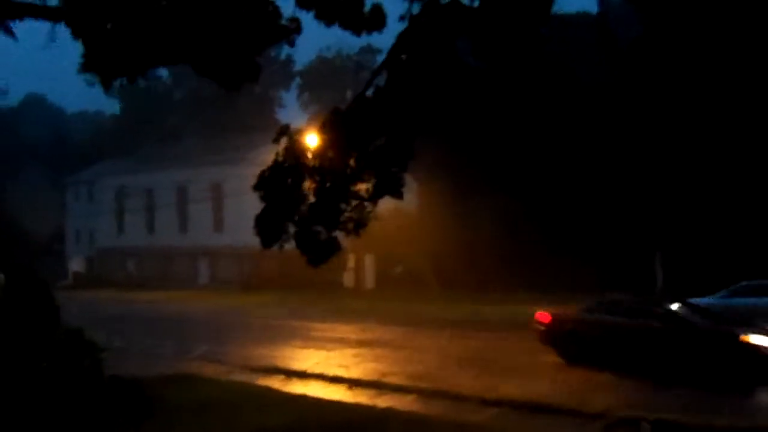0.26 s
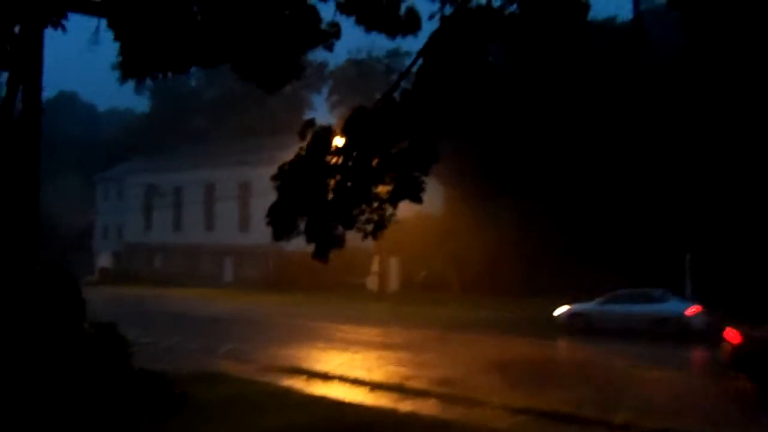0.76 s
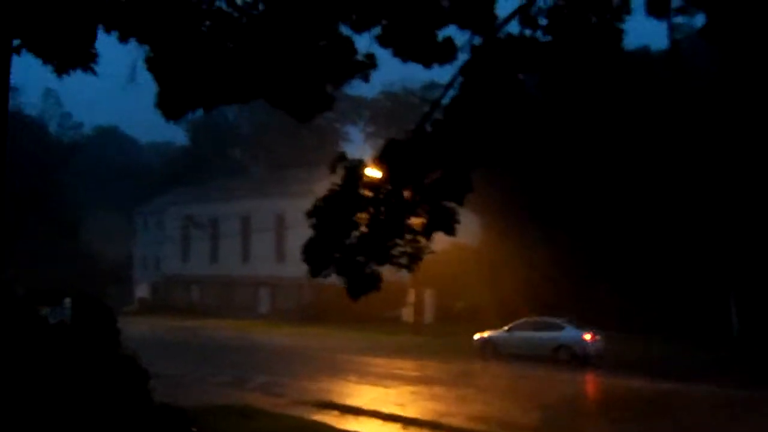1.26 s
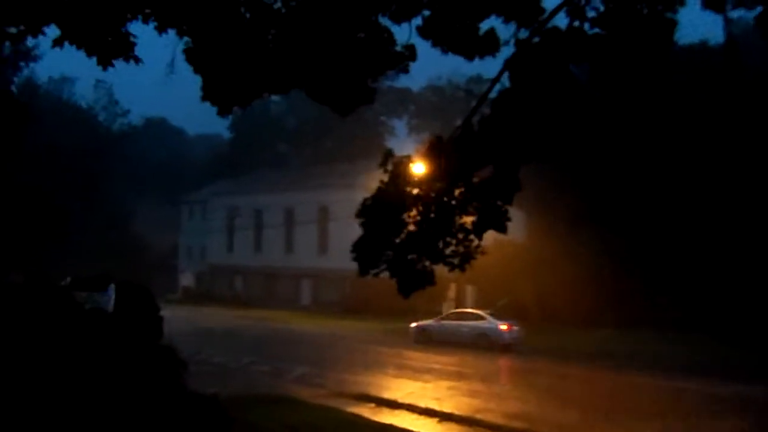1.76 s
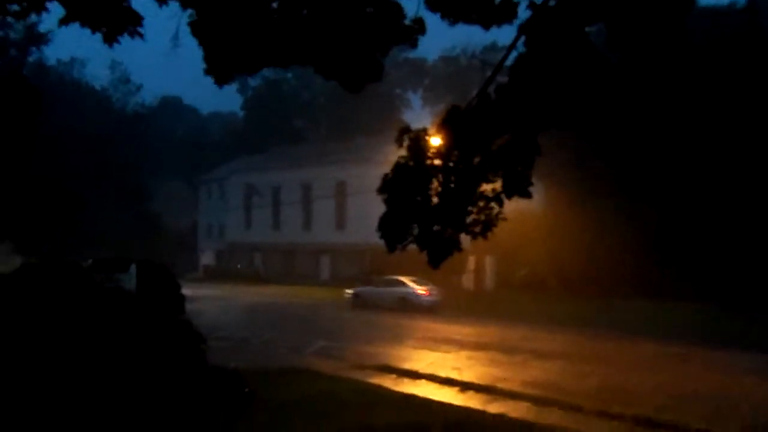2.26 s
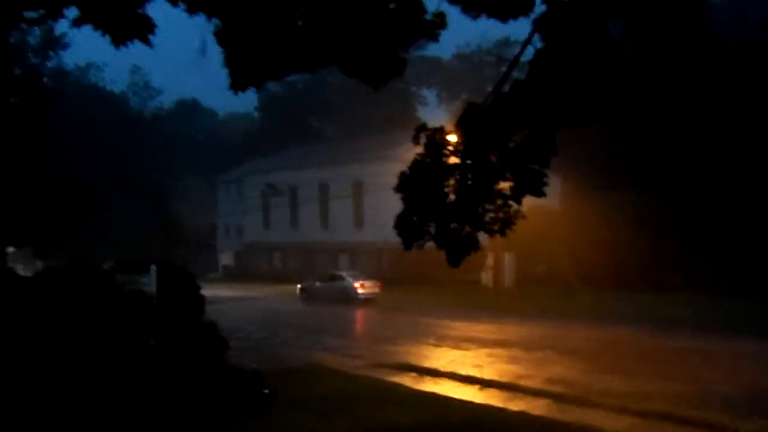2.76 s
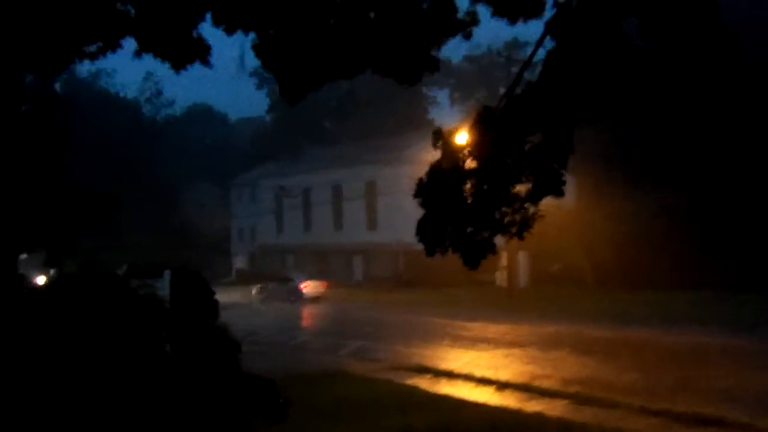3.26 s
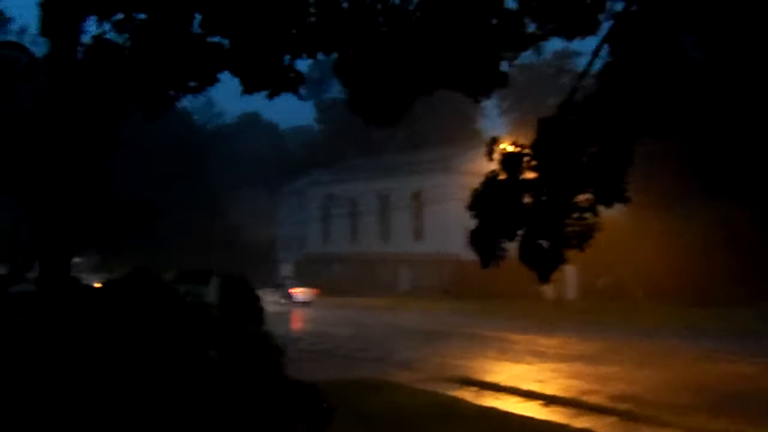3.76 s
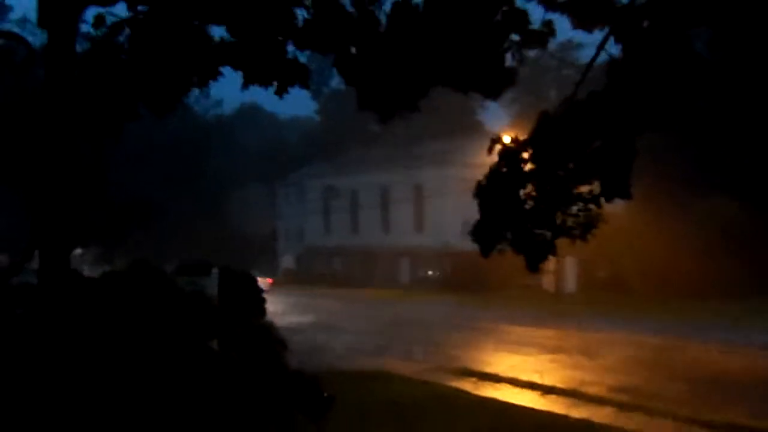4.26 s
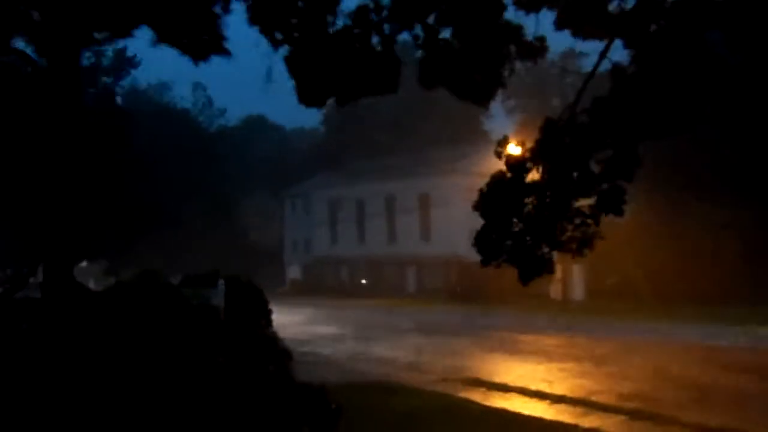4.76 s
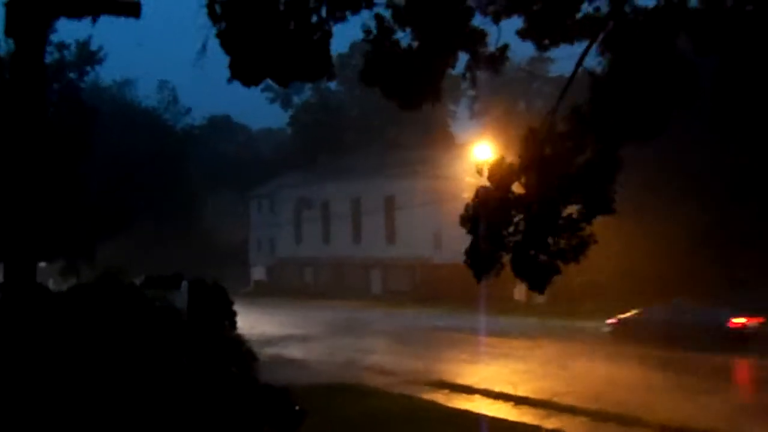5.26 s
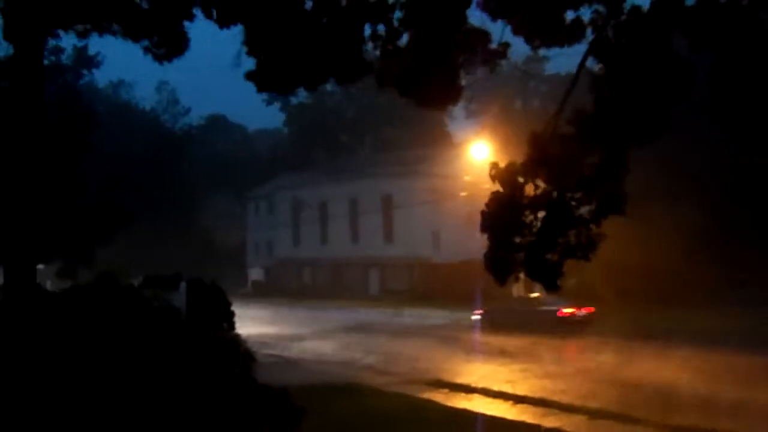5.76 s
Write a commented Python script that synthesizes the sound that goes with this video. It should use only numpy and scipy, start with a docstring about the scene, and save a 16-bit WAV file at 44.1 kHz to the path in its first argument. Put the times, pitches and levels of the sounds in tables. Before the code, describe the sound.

Outdoors on a wet street at dusk, dense rain hisses continuously on asphalt and leaves, blended with the broad wash of car tyres. Low thunder starts within the first second, thumps and rumbles, ebbs around three seconds, then builds into a much louder near peal just before five seconds, rolling on to the end. One small microphone, mono; the loud thunder flattens and pushes the rain down.

```python
"""Street at dusk in heavy rain, heard by one small microphone; tyres hiss past on the wet road.
Rain and tyres: patchy filtered noise plus grains. Far traffic: a low filtered-noise drone.
Thunder: filtered impulses under overlapping peals, with single claps of a few low cycles.
The last peal is near enough to pull the gain control down and to clip."""
import sys
import numpy as np
from scipy import signal
from scipy.fft import rfft, irfft, next_fast_len
from scipy.io import wavfile
from scipy.ndimage import uniform_filter1d, minimum_filter1d, map_coordinates

SR = 44100
rng = np.random.default_rng(int(sys.argv[2]) if len(sys.argv) > 2 else 0)


def materialize(psi):
    """Save the field psi as 16-bit PCM at rate SR to the path in sys.argv[1].

    A 1-D psi becomes a single channel; in a 2-D psi each row is a channel.
    """
    bounded = np.clip(np.atleast_2d(psi).T, -1, 1)
    quanta = np.round(bounded * 32767).astype(np.int16)
    wavfile.write(sys.argv[1], SR, quanta)


def invert_db(level):
    """Linear amplitude ratio for a level in decibels (20 dB per decade), elementwise."""
    return 10 ** (np.asarray(level, dtype=float) / 20)


N = 265041  # samples

# Wet street, ahead of gain control: [t/s, road rain level/dB, tyre roar re road/dB, leaf patter re road/dB]
STREET_LEVELS = [(0.0, -30.5, -4.5, -2), (0.4, -32.5, -2.5, -2), (0.9, -34, -1.5, -2.1),
                 (1.4, -33.5, -1.5, -1.5), (2.1, -33, -2, -1), (2.7, -32, -2, -.3), (3.3, -31, -2.5, -0.6),
                 (3.6, -29.5, -2.5, 0), (3.85, -28.5, -4, -4.5), (4.3, -29, -3.5, -3.8), (4.9, -29, -5, -3),
                 (5.3, -27.5, -3, -3), (6.0, -28, -4, -3)]
# Thunder peals, ahead of gain control:
# [arrival t/s, strength/dB, fade/(dB/s) with sign ignored, boom re strength/dB, crackle re strength/dB]
THUNDER_PEALS = [(0.55, -32.5, 16, 1, -11), (0.63, -33.5, 14, 0, -21), (0.87, -38, 10.5, 6, -17),
                 (1.23, -28, 60, 2, -9), (1.35, -28, 40, -15, -15), (1.6, -39.5, 4, 4, -14),
                 (2.06, -27, 33, -6, -7.5), (2.11, -27.5, 33, -1.5, -10), (2.4, -34.5, 8.5, -4, -10.5),
                 (2.93, -41, 20, -4, -13), (3.36, -31, 18, -8, -10), (3.62, -37, 12, -6, -5),
                 (4.06, -36, 10, -6, -11), (4.27, -26, 25, 0, -5), (4.31, -21, 16, -6, -5.5),
                 (4.43, -21, 23, -14, -9), (4.561, -25.5, 14, 3.5, -17), (4.69, -16.5, 15, -8, -8.5),
                 (4.86, -11.5, 36, -3.5, -6.5), (4.94, -14, 58, 2.5, -29), (5.12, -17.5, 15, -3, -9),
                 (5.33, -16.5, 52, -3, -15), (5.5, -21.5, -0.5, -2, -14.5), (5.93, -15.5, 10, -5, -17)]
# Claps that stand out of the roll, ahead of gain control: [centre t/s, peak level/dB, f/Hz]
THUNDER_CLAPS = [(0.685, -20, 180), (0.692, -27, 67.5), (0.931, -25, 89), (1.03, -21, 68), (1.13, -23, 72),
                 (1.29, -18.5, 68.4), (1.335, -16.5, 67.4), (1.391, -22.5, 157), (2.148, -21, 60),
                 (2.153, -19, 158), (2.196, -20, 182), (2.221, -20, 79), (2.249, -27, 183),
                 (2.842, -25, 209), (3.65, -26, 65), (4.15, -23, 156), (4.338, -20, 90), (4.349, -13, 213),
                 (4.385, -14, 240), (4.392, -14, 79.6), (4.448, -21, 78), (4.474, -14, 245),
                 (4.518, -18, 278), (4.55, -9, 214), (4.585, -15.5, 55), (4.717, -7, 209), (4.771, -6, 209),
                 (4.844, -2, 267), (4.896, -0.5, 240), (4.91, -8, 42), (4.919, -5, 104), (4.965, -3, 243),
                 (4.975, -8, 89), (5.005, -11.5, 36), (5.183, -9, 158), (5.205, -10, 183), (5.23, -8, 182),
                 (5.373, -9, 182), (5.416, -11.3, 209), (5.637, -10.5, 118), (5.677, -14, 120),
                 (5.986, -14, 102)]
# Rain on the road, spectrum: [f/Hz, relative level/dB per Hz]
ROAD_SPECTRUM = [(1240, -12.5), (2100, -3.5), (2530, 0), (3490, 1.5), (4700, -5.5), (6110, -13),
                 (10300, -120)]
# Bright spatter of drops, spectrum: [f/Hz, relative level/dB per Hz]
SPATTER_SPECTRUM = [(4300, -15.5), (7300, -3.5), (9500, -2.5), (12300, -3.5), (14200, -7.5)]
# Rain on leaves, spectrum: [f/Hz, relative level/dB per Hz]
LEAF_SPECTRUM = [(2590, -22), (4400, -0.5), (6300, -1), (7800, -6), (10100, -14.5), (17200, -120)]
# Tyres on the wet road, spectrum: [f/Hz, relative level/dB per Hz]
TYRE_SPECTRUM = [(240, -28), (400, -6.5), (477, -8.5), (509, -5.5), (921, -2), (1570, -1), (2300, -2),
                 (2990, -44), (5060, -120)]
# Thunder, lowest range, spectrum: [f/Hz, relative level/dB per Hz]
BOOM_SPECTRUM = [(12, -34), (20, -10), (45, -1.5), (60, 1), (72, 5), (86, -5), (110, -11.5), (140, -11),
                 (240, -120)]
# Thunder, middle range, spectrum: [f/Hz, relative level/dB per Hz]
BODY_SPECTRUM = [(56, -50), (95, -5), (145, 0.5), (209, 1.5), (351, -9), (420, -18), (550, -36),
                 (920, -120)]
# Thunder, upper range, spectrum: [f/Hz, relative level/dB per Hz]
CRACKLE_SPECTRUM = [(220, -28), (380, -2.5), (470, -3), (570, -1), (680, -6.5), (900, -9.5), (1300, -19),
                    (1700, -40), (2860, -120)]
# Engines and far traffic, spectrum: [f/Hz, relative level/dB per Hz]
TOWN_SPECTRUM = [(13, -33), (22, 0), (54, -0.5), (136, -1), (233, 0), (272, -2.5), (450, -19), (580, -34),
                 (990, -120)]

# Spatter re road: start, growth, ceiling
SPATTER_START_DB, SPATTER_GROWTH_DB_PER_S, SPATTER_CEILING_DB = -4.2, 0.6, -2
PEAL_RISE_S, CRACKLE_FADE_RATIO = 0.025, 1.77
CLAP_CYCLES_AT_200_HZ, CLAP_CYCLES_POWER = 4.13, 0.26  # deeper claps have fewer cycles


def rain():
    """Drops and tyres merge into a patchy hiss; gusts sway the finer layers."""
    road_db, tyre_db, leaf_db = curves(STREET_LEVELS)
    growing_db = SPATTER_START_DB + SPATTER_GROWTH_DB_PER_S * np.arange(N) / SR
    spatter_db = np.minimum(growing_db, SPATTER_CEILING_DB)
    gust = wobble(11) + 0.98 * wobble(22)
    tyres = invert_db(tyre_db) * coloured(patchy_noise(patchy_db=0.5), TYRE_SPECTRUM)
    road = invert_db(0.17 * gust) * coloured(drops(), ROAD_SPECTRUM)
    leaves = invert_db(leaf_db + 0.34 * gust) * coloured(drops(), LEAF_SPECTRUM)
    spatter = invert_db(spatter_db + 0.22 * gust) * coloured(drops(), SPATTER_SPECTRUM)
    return invert_db(road_db) * (tyres + road + leaves + spatter)


def drops():
    """Far drops merge into patchy noise; nearer drops add a faint grain of impulses."""
    far = patchy_noise(patchy_db=0.76)
    near = impacts(count=30000, spread_db=2.5)
    return far + invert_db(-8.5) * near


def roll():
    """Shocks from every bend of the lightning channel overlap; ground and walls colour three ranges."""
    shocks = impacts(count=20000, spread_db=1.23)
    # the low and middle ranges roll on more evenly between the shocks
    boom = evened(coloured(shocks, BOOM_SPECTRUM), share=0.3)
    body = evened(coloured(shocks, BODY_SPECTRUM), share=0.53)
    crackle = coloured(shocks, CRACKLE_SPECTRUM)
    return np.sum(peals() * [boom, body, crackle], axis=0)


def peals():
    """Gains of boom, body, crackle: each peal rises fast and fades; overlapping peals add in power."""
    arrival_s, strength_db, fade, boom_db, crackle_db = np.transpose(THUNDER_PEALS)[..., None]
    grid_s = np.arange(0, N / SR + .002, .002)
    since_s = np.maximum(grid_s - arrival_s, 0)
    fallen_db = abs(fade) * since_s
    level_db = [strength_db + boom_db - fallen_db,
                strength_db - fallen_db,
                strength_db + crackle_db - CRACKLE_FADE_RATIO * fallen_db]
    rise = 1 - np.exp(-since_s / PEAL_RISE_S)
    gains = np.linalg.norm(invert_db(level_db) * rise, axis=1)
    return np.array([np.interp(np.arange(N) / SR, grid_s, gain) for gain in gains])


def claps():
    """Each clap is a short swell of a few low cycles, with a burst of crackle riding on it."""
    out = np.zeros(N + SR)
    crackle = coloured(impacts(count=12000, spread_db=2.0), CRACKLE_SPECTRUM)
    crackle = np.pad(crackle, (0, SR))
    phases = rng.random(len(THUNDER_CLAPS))  # in cycles
    for (centre_s, peak_db, hz), phase in zip(THUNDER_CLAPS, phases):
        cycles = CLAP_CYCLES_AT_200_HZ * (hz / 200) ** CLAP_CYCLES_POWER
        t = np.arange(int(cycles * SR / hz)) / SR
        swell = np.sin(np.pi * t * hz / cycles) ** 2
        start = round(centre_s * SR) - len(t) // 2
        span = slice(start, start + len(t))
        tone = np.sin(2 * np.pi * (hz * t + phase))
        out[span] += invert_db(peak_db) * swell * (tone + invert_db(-20.5) * crackle[span])
    return out[:N]


def town():
    """The low drone of engines and far traffic, as filtered noise."""
    return invert_db(-41) * coloured(rng.standard_normal(N), TOWN_SPECTRUM)


def unit(x):
    """Scaled to rms 1."""
    return x / np.sqrt(np.mean(x ** 2) + 1e-20)


def curves(rows):
    """One value per sample for each column after the time."""
    t_s, *columns = np.transpose(rows)
    return [np.interp(np.arange(N) / SR, t_s, column) for column in columns]


def wobble(knots_per_s):
    """A smooth random curve through normally distributed knots."""
    knots = rng.standard_normal(int(N * knots_per_s / SR) + 4)
    return map_coordinates(knots, [np.arange(N) * knots_per_s / SR])


def coloured(x, spectrum):
    """x filtered through spectrum points joined on a log frequency axis, at rms 1."""
    size = next_fast_len(N + 8192)
    hz, db = np.transpose(spectrum)
    bins_hz = np.fft.rfftfreq(size, 1 / SR)
    gain = invert_db(np.interp(np.log(bins_hz + 1), np.log(hz + 1), db))
    return unit(irfft(rfft(x, size) * gain, size)[:N])


def impacts(count, spread_db):
    """A white stream of impulses at random moments, a few much stronger than the rest."""
    when, sign, size = rng.random((count, 3)).T
    strength = np.sign(sign - .5) * invert_db(-spread_db * np.log(1 - size))
    return unit(np.bincount((when * N).astype(int), strength, N))


def patchy_noise(patchy_db):
    """White noise whose gain drifts in patches of pitch and time."""
    z = signal.stft(rng.standard_normal(N), nperseg=512)[2]
    field = uniform_filter1d(rng.standard_normal(z.shape), size=8, axis=0)
    field = uniform_filter1d(field, size=10, axis=1)
    return signal.istft(z * invert_db(patchy_db * unit(field)), nperseg=512)[1][:N]


def evened(x, share):
    """x with a share of its chance swells levelled out, at rms 1."""
    envelope = np.abs(signal.hilbert(x, next_fast_len(N))[:N])
    swell = uniform_filter1d(envelope, 900)
    return unit(x / swell ** np.clip(share, 0, 1))


def scene():
    """One microphone feeds both channels."""
    return np.tile(rain() + roll() + claps() + town(), (2, 1))


def recent_mean(x, window_s):
    """Mean over the window just past."""
    size = int(window_s * SR)
    return signal.fftconvolve(x, np.ones(size) / size)[:N]


def gain_control(x, listen_s, hold_s, threshold_db, slope):
    """Gain falls as the recent mean level passes the threshold, and stays down for the hold time."""
    power = np.abs(recent_mean(x[0] ** 2, listen_s))
    level_db = 10 * np.log10(power + 1e-9)
    wanted_db = -slope * np.maximum(level_db - threshold_db, 0)
    span = int(hold_s * SR) // 2 * 2 + 1
    # origin turns the minimum towards the past
    held_db = minimum_filter1d(wanted_db, span, origin=span // 2, mode="nearest")
    return x * invert_db(recent_mean(held_db, 0.082))


def low_pass(x):
    """Removes everything above the highest recorded frequency."""
    return signal.sosfilt(signal.butter(12, 13980, fs=SR, output="sos"), x)


def record(dry):
    """Gain control, an input stage that flattens the highest peaks, a band limit."""
    x = gain_control(dry, listen_s=0.4, hold_s=1.3, threshold_db=-22.0, slope=1.03)
    x = x / (1 + np.abs(x / 0.32) ** 9) ** (1 / 9)  # peaks stay below 0.32
    in_band = np.fft.rfftfreq(N, 1 / SR) < 13980  # Hz
    x = irfft(rfft(x) * in_band, N)
    return low_pass(x)


dry = scene()
out = record(dry)
materialize(out)
```